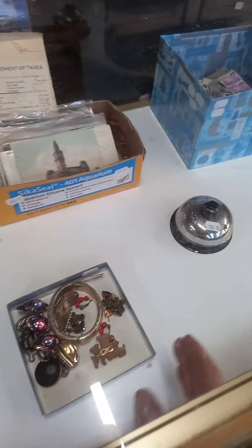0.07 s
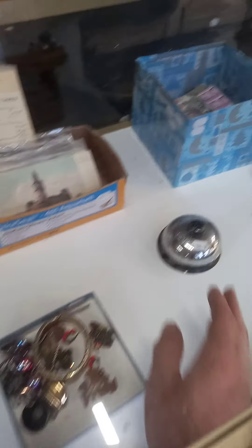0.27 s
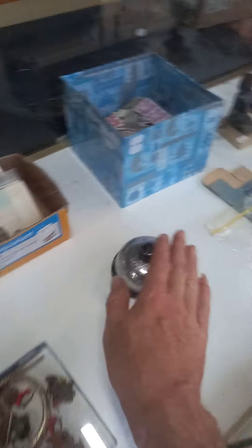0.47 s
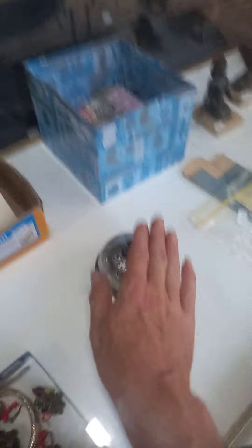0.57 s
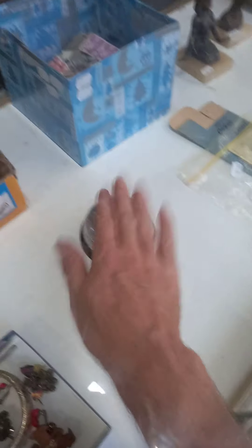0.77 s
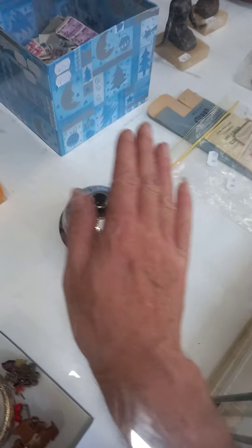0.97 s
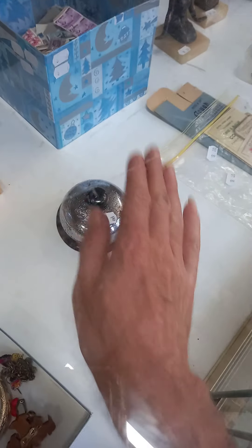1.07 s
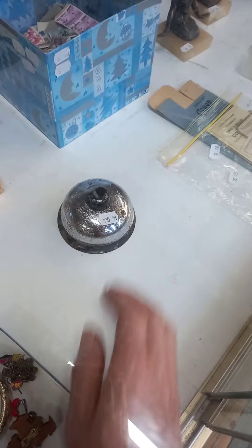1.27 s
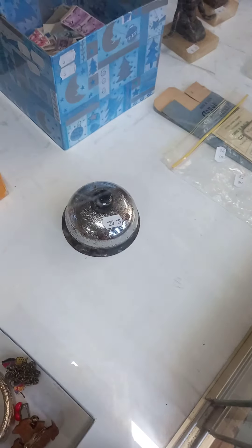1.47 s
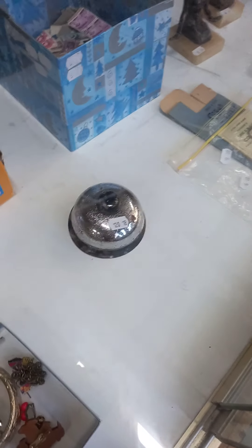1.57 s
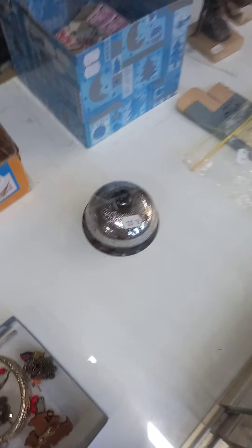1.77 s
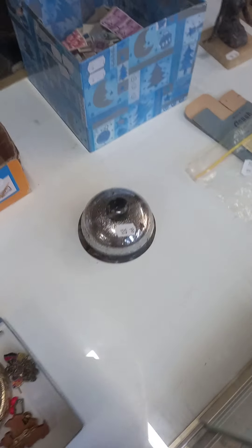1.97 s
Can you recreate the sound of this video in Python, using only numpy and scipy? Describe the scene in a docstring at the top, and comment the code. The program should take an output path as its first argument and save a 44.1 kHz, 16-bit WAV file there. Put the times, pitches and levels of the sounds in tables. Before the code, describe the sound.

A metal counter bell gives one bright ding, starting with a sharp click and small thump and fading unevenly. Before it, the moving hand-held microphone picks up low handling rumble and light rustling in a quiet shop.

```python
"""First comes the low rumble of a hand-held microphone pair in a quiet shop, with scuffs brushing by.
Then a hand slaps the button of a steel counter bell: a crack, a thump in the base, and the dome
rings in pairs of close modes and fades. As the microphones move, a reflection of the bell takes an
ever shorter detour, so the ring swells and sinks. The right microphone faces the bell."""
import sys
import numpy as np
from scipy import signal
from scipy.io import wavfile
from scipy.ndimage import uniform_filter1d

SR = 44100
rng = np.random.default_rng(int(sys.argv[2]) if len(sys.argv) > 2 else 0)


def master_out(mix):
    """Clip the mix to full scale and print it as 16-bit PCM to the path in sys.argv[1]."""
    frames = np.transpose(np.atleast_2d(mix))
    ceiling = np.clip(frames, -1, 1)
    pcm = np.round(ceiling * 32767).astype(np.int16)
    wavfile.write(sys.argv[1], SR, pcm)


N = 89346

BUTTON_S, STRIKE_S = .826, .834
# dome modes: (pitch [Hz], right level [dB], left level [dB], t60 [s], attack [s], right polarity,
# left polarity, right reflection [dB], left reflection [dB], extra detour [mm])
DOME_MODES = [(1097.3, -41.5, -57.0, 2.4, .04, -1, 1, -3.7, -8.0, 212.0),
              (1119.6, -30.5, -43.0, 3.0, .045, 1, -1, -20.0, -15.0, 304.0),
              (2832.6, -19.2, -33.0, 2.9, .008, 1, 1, -4.2, -4.0, 50.0),
              (7642.0, -39, -59.3, .82, .003, 1, 1, -12.0, -9.0, 42.5),
              (7706.0, -21.5, -43.0, .7, .003, 1, 1, -10.0, -9.0, 9.9),
              (10702.0, -23.0, -44.0, .36, .002, 1, 1, -8.0, -6.0, 21.4),
              (14205.0, -19, -29, .2, .002, 1, 1, -2.0, -4.0, 20.2)]
# the bell's reflection: (time [s], detour [m], level [dB])
REFLECTION = [(0.87, 1.402, -22.2), (0.95, 1.339, -16.3), (1.05, 1.264, -8.9), (1.17, 1.177, 0.0),
              (1.3, 1.116, -0.3), (1.42, 1.061, -0.6), (1.55, 0.983, -0.9), (1.67, 0.928, -1.2),
              (1.85, 0.848, -1.6), (2.03, 0.728, -2.0)]
SOUND_M_PER_S, LEFT_DETOUR_M, LEFT_LAG_S = 343, .022, .00003
# the ring's treble swells and sinks on each side as hand and microphones move:
# (time [s], right gain at 8 kHz [dB], left gain at 8 kHz [dB])
RING_TREBLE_LEVEL = [(.84, 4, -0.5), (.9, 3.5, 5), (.94, -3, 7.5), (1.0, 3.5, 9.5), (1.1, 0.5, 6),
                     (1.18, -0.5, 2.5), (1.3, 1, 2.5), (1.55, 1, -11), (1.8, 4.5, -4), (2.03, -1, -1)]
TREBLE_SLOPE = .94
WAVER_DB, WAVER_PER_S, WAVER_GROWS_S = 3.5, 6.0, .27   # the ring wavers as the microphones move
# uneven fade of the beating pair, right side: (time [s], lower mode level [dB], upper mode level [dB])
PAIR_FADE = [(.87, -19, -27), (.93, -29, -23.5), (.97, -26.5, -27.5), (1.07, -29, -37.5),
             (1.14, -44, -38.5), (1.19, -46.5, -35), (1.28, -36.5, -40), (1.33, -49.5, -45),
             (1.4, -36.5, -40.5), (1.43, -39, -61.5), (1.465, -58, -46), (1.5, -42, -64),
             (1.55, -49, -62.5), (1.64, -59.5, -55.5), (1.72, -55.5, -65.5), (1.78, -53, -61.5),
             (1.86, -72.5, -64.5), (2.02, -64, -77.5)]
PAIR_HZ, PAIR_LEFT_DB, PAIR_WANDER_RAD = (5010.5, 5066.0), -9.5, .59
# faint dome overtones: (pitch [Hz], level [dB], t60 [s])
OVERTONES = [(2195, -57, 1.2), (3330, -65, 1.3), (3932, -61, 1.1), (5540, -66, 1.6), (8990, -54, .14),
             (9480, -53, .14), (10020, -56, .35), (11500, -38, .1), (12720, -50, .38), (14130, -43, .25),
             (15390, -40, .22)]
SHIMMER_HZ, SHIMMER_MIN_DB, SHIMMER_MEAN_T60_S = (10400, 15600), -55, .2
OVERTONE_PAN_DB, FLICKER_DB, FLICKER_PER_S = -8.5, 5, 18

# tone of the crack: (frequency [Hz], relative density [dB])
CRACK_TONE = [(50, -12.5), (100, 2), (300, -10.5), (700, -18), (1500, -20.5), (3000, -20.5), (4300, -22),
              (6500, -18.5), (8000, -15.5), (9000, -42.5), (10200, -38.5), (11300, -2), (13000, -11),
              (14500, -15), (16000, -24.5)]
# decay of its tail: (frequency [Hz], t60 [s])
TAIL_DECAY = [(100, 0.52), (300, 0.66), (1500, 0.3), (4000, .24), (6500, 0.27), (9000, 0.069),
              (12000, 0.13), (15500, 0.094)]
# its placement: (frequency [Hz], left minus right [dB])
CRACK_PAN = [(60, -9), (110, -5), (200, 4), (380, -3.5), (700, -8), (1290, -14.5), (4400, -10.5),
             (8120, -8.5), (15000, -26.5)]
BUTTON_DB, SNAP_DB, TAIL_DB, ATTACK_CYCLES = -23.5, -23.5, -32, 1.6
# modes of base and counter: (pitch [Hz], level [dB], t60 [s])
BASE_MODES = [(95, -51, 0.27), (255, -32.5, .15), (1890, -39, 0.028)]
# their placement: (frequency [Hz], left minus right [dB])
BASE_PAN = [(100, -6.5), (270, 5), (800, -10), (2000, -16.5)]
CHATTER_FROM_S, CHATTER_TO_S, CHATTER_PER_S, CHATTER_DB = .022, .062, 450, -7.5   # as the hand presses

# scuff cues: (time [s], level [dB], t60 [s], left minus right [dB])
SCUFF_CUES = [(.081, -49, 0.1, -12.5), (0.094, -46.5, 0.35, -5), (0.336, -49.5, 0.089, -8),
              (0.352, -56, 0.26, -11), (0.952, -50, 0.12, -10), (1.525, -66, 0.22, -11.5)]
# scuff tone: (frequency [Hz], relative density [dB])
SCUFF_TONE = [(410, -42), (700, -6.5), (1700, -8), (2640, -8), (3480, -33.5), (3900, -14.5), (4950, -34.5),
              (14000, -52.5)]
# tick cues: (time [s], level [dB], pitch [Hz], t60 [s], left minus right [dB])
TICK_CUES = [(.505, -60.5, 5170, .02, -10), (.956, -56, 3900, .02, -9), (1.990, -44.5, 9600, 0.0013, -16)]
# opening grip rumble: (time [s], level [dB])
RUMBLE_FADER = [(0, -37), (.05, -40), (.1, -32), (.24, -32), (.3, -37), (.35, -38), (.44, -58), (.52, -66),
                (.6, -78)]
# its tone: (frequency [Hz], relative density [dB])
RUMBLE_TONE = [(30, -35), (55, -23), (82, -1), (105, 2.5), (133, -16.5), (168, -1), (195, -23), (265, -1),
               (320, -24.5), (364, -2.5), (440, -19), (550, -18.5), (900, -33), (1600, -41), (2700, -46),
               (3200, -68)]
# later, softer bumps: (time [s], level [dB])
BUMP_FADER = [(1.1, -72), (1.25, -57.5), (1.29, -68.5), (1.37, -58), (1.464, -62.5), (1.522, -49.5),
              (1.614, -62.5), (1.65, -71), (1.788, -79.5), (1.81, -64), (1.846, -53.5), (1.896, -53),
              (1.998, -83), (2.026, -60.5)]
# their tone: (frequency [Hz], relative density [dB])
BUMP_TONE = [(30, -15), (81, -1.5), (125, -7.5), (208, 1), (353, -17.5), (453, -13), (556, -40),
             (1000, -21), (1300, -58), (2200, -120)]
# placement of rumble and bumps: (frequency [Hz], left minus right [dB])
HANDLING_PAN = [(60, 0.5), (400, -2.5), (700, 5), (1300, -9), (2400, -16)]

# the shop's room tone: (frequency [Hz], relative density [dB])
ROOM_TONE = [(30, -30.5), (60, -9), (106, -3.5), (250, -9), (500, -20), (1000, -18), (1500, -22.5),
             (2600, -26), (3000, -43.5), (3700, -34), (4900, -32.5), (6000, -25.5), (7300, -33),
             (8300, -48), (10000, -41.5), (12000, -38.5), (16000, -46)]
# its placement: (frequency [Hz], left minus right [dB])
ROOM_PAN = [(60, 4), (110, 0.5), (200, 1.5), (380, -1.5), (700, -3.5), (1290, 0), (2380, -14), (4400, 5),
            (8120, -2), (15000, -3.5)]
# ride on its hiss, with a brief rustle near 1.54 s, taken about the mean: (time [s], level [dB])
HISS_FADER = [(0.0, -80.5), (0.28, -76.5), (0.66, -82.5), (0.88, -87.5), (0.97, -75.5), (1.36, -88),
              (1.43, -82.5), (1.52, -82), (1.538, -76.5), (1.56, -89), (2.03, -92)]
# stereo width of all noise layers: (frequency [Hz], left-right correlation [0..1])
CORRELATION = [(60, 0.95), (240, 0.86), (950, 0.49), (3770, 0.14), (15000, 0.52)]
ROOM_DB, LOW_CUT_HZ, HIGH_CUT_HZ = -65.5, 40, 16500
NOW = np.arange(N) / SR


def dome():
    """Each mode arrives direct and reflected, phasing with itself; the highs swell and sink most."""
    out = np.zeros((2, N))
    detour_m, reflection_db = in_time(REFLECTION)
    treble_db = in_time(RING_TREBLE_LEVEL)[::-1]
    for (hz, right_db, left_db, t60, attack_s, right_sign, left_sign,
         right_echo_db, left_echo_db, extra_mm) in DOME_MODES:
        sides = [(left_db, left_sign, left_echo_db), (right_db, right_sign, right_echo_db)]
        for side, (db, sign, echo_db) in enumerate(sides):
            age = NOW - STRIKE_S - LEFT_LAG_S * (1 - side)
            waver_db = WAVER_DB * drift(WAVER_PER_S) * np.clip(age / WAVER_GROWS_S, 0, 1)
            motion_db = (treble_db[side] + waver_db) * (hz / 8000) ** TREBLE_SLOPE
            echo_m = detour_m + extra_mm / 1000 + LEFT_DETOUR_M * (1 - side)
            for delay_s, path_db in ((0, 0), (echo_m / SOUND_M_PER_S, reflection_db + echo_db)):
                rung_s = np.maximum(age - delay_s, 0)
                attack = 1 - np.exp(-rung_s / attack_s)
                level = from_db(db + path_db + motion_db - 60 * rung_s / t60)
                out[side] += sign * attack * level * np.sin(2 * np.pi * hz * rung_s)
    return out


def beating_pair():
    """Two close modes beat; wandering phases make the flutter uneven, with shallower dips on the left."""
    out, age = np.zeros((2, N)), np.maximum(NOW - STRIKE_S, 0)
    attack = 1 - np.exp(-age / .0055)
    for hz, right_db in zip(PAIR_HZ, in_time(PAIR_FADE)):
        left_db = PAIR_LEFT_DB + uniform_filter1d(right_db, size=SR // 8) + WAVER_DB * drift(WAVER_PER_S)
        for side, db in enumerate((left_db, right_db)):
            wander = PAIR_WANDER_RAD * drift(WAVER_PER_S) * np.clip(age / WAVER_GROWS_S, 0, 1)
            out[side] += attack * from_db(db) * np.sin(2 * np.pi * hz * age + wander)
    return out


def overtones():
    """Flickering overtones and a shimmer of weak modes at random pitches, each side in its own phase."""
    pitch, loudness, length = rng.random((40, 3)).T
    shimmer = zip(np.interp(pitch, [0, 1], SHIMMER_HZ), SHIMMER_MIN_DB + 10 * loudness,
                  SHIMMER_MEAN_T60_S * (.5 + length))
    out, age = 0, np.maximum(NOW - STRIKE_S, 0)
    for hz, db, t60 in [*OVERTONES, *shimmer]:
        level = from_db(db + FLICKER_DB * drift(FLICKER_PER_S)) * decay(STRIKE_S, t60, attack_s=.00504)
        cycles = hz * age + rng.random((2, 1))
        out += level * np.sin(2 * np.pi * cycles + drift(FLICKER_PER_S))
    return pan(OVERTONE_PAN_DB) * out


def crack():
    """The transient: button touch, clapper snap, and a noisy tail dying band by band."""
    def envelope(hz):
        soften_s = ATTACK_CYCLES / hz   # low bands speak more slowly
        touch = from_db(BUTTON_DB) * decay(BUTTON_S, t60=.084, attack_s=.00095 + soften_s)
        snap = from_db(SNAP_DB) * decay(STRIKE_S, t60=.011, attack_s=.0003)
        tail = from_db(TAIL_DB) * decay(STRIKE_S, at_hz(TAIL_DECAY, hz), attack_s=.001025 + soften_s)
        return pan(at_hz(CRACK_PAN, hz)) * (touch + snap + tail)
    return noise_bands(CRACK_TONE, envelope)


def base_thump():
    """The body of the hit: the slap and the chattering button set base and counter ringing."""
    out, age = 0, NOW - BUTTON_S
    pressing = (age > CHATTER_FROM_S) * (age < CHATTER_TO_S)
    for hz, db, t60 in BASE_MODES:
        contacts = pressing * (rng.random(N) < CHATTER_PER_S / SR)
        clicks = contacts * rng.standard_normal(N) * from_db(CHATTER_DB)
        clicks[int(BUTTON_S * SR)] = 1   # the slap itself
        out += from_db(db) * pan(at_hz(BASE_PAN, hz)) * ring(clicks, hz, t60)
    return out


def scuffs():
    """Short brushes of grainy noise."""
    envelope = sum(from_db(db) * pan(pan_db) * decay(s, t60, attack_s=.00075)
                   for s, db, t60, pan_db in SCUFF_CUES)
    return noise_bands(SCUFF_TONE, lambda hz: envelope * from_db(3 * drift(60)))


def ticks():
    """Thin ticks, each a click with one brief high ring."""
    return sum(pan(pan_db) * ring(from_db(db) * (np.arange(N) == int(s * SR)), hz, t60)
               for s, db, hz, t60, pan_db in TICK_CUES)


def handling():
    """Lumpy low rumble from the grip, strong at first, later a few soft bumps."""
    out, lumps_db = 0, .45 * drift(7.2)
    for fader, tone in ((RUMBLE_FADER, RUMBLE_TONE), (BUMP_FADER, BUMP_TONE)):
        gate = (NOW >= fader[0][0]) * (NOW <= fader[-1][0])
        rumble = noise_bands(
            tone, lambda hz: pan(at_hz(HANDLING_PAN, hz)) * from_db(lumps_db + 3 * drift(17)))
        out += gate * from_db(in_time(fader)[0]) * rumble
    return out


def shop():
    """A faint bed of room tone; its hiss sinks and swells, and a brief bright rustle rides on it near 1.54 s."""
    hiss_db = in_time(HISS_FADER)[0]
    hiss_db -= hiss_db.mean()
    return from_db(ROOM_DB) * noise_bands(
        ROOM_TONE, lambda hz: pan(at_hz(ROOM_PAN, hz)) * from_db(.76 * drift(3) + (hz > 2800) * hiss_db))


def from_db(db):
    """Decibels to gain."""
    return 10 ** (np.asarray(db) / 20)


def at_hz(rows, hz):
    """Read a table on a log-frequency axis."""
    frequencies, values = np.transpose(rows)
    return np.interp(np.log(hz), np.log(frequencies), values)


def in_time(rows):
    """A table's automation curves at every sample."""
    times, *columns = np.transpose(rows)
    return [np.interp(NOW, times, column) for column in columns]


def pan(db):
    """Left and right gains for a left-minus-right level."""
    return from_db([[db / 2], [-db / 2]])


def decay(start_s, t60, attack_s):
    """Percussive envelope: a quick rise, then 60 dB down per t60."""
    age = np.maximum(NOW - start_s, 0)
    return (1 - np.exp(-age / attack_s)) * from_db(-60 * age / t60)


def drift(rate):
    """Smooth random modulation of spread 1, rolling off above rate [Hz]."""
    hop, settle = 40, 2000
    pole = np.exp(-2 * np.pi * rate * hop / SR)
    white = rng.standard_normal(N // hop + settle + 2)
    slow = signal.lfilter([1], [1, -2 * pole, pole * pole], white)[settle:]
    return np.interp(np.arange(N) / hop, np.arange(len(slow)), slow / slow.std())


def ring(clicks, hz, t60):
    """Resonator: a unit click starts a dying sine of height 1."""
    pole, step = from_db(-60 / (t60 * SR)), 2 * np.pi * hz / SR
    return signal.lfilter([0, np.sin(step)], [1, -2 * pole * np.cos(step), pole * pole], clicks + 1e-18)


def noise_bands(tone, envelope):
    """Quarter-octave bands of stereo noise, total rms 1, then each shaped by envelope(hz)."""
    low, high = tone[0][0], min(tone[-1][0], .45 * SR)
    edges = np.geomspace(low, high, int(4 * np.log2(high / low)) + 1)
    centres = np.sqrt(edges[1:] * edges[:-1])
    gains = from_db(at_hz(tone, centres))
    gains /= np.sqrt(np.sum(gains ** 2 * np.diff(edges)) * 2 / SR)
    white, out = rng.standard_normal((2, 2, N + SR // 4)), 0
    for k, hz in enumerate(centres):
        bandpass = signal.butter(3, edges[k:k + 2], "band", fs=SR, output="sos")
        mid, side = signal.sosfilt(bandpass, white[k % 2])[:, -N:]
        alike = at_hz(CORRELATION, hz)
        stereo = np.sqrt((1 + alike) / 2) * mid + np.sqrt((1 - alike) / 2) * side * [[1], [-1]]
        out += gains[k] * envelope(hz) * stereo
    return out


def scene():
    """The stereo mix: the bell in front, small noises and room tone behind."""
    bell = dome() + beating_pair() + overtones() + crack() + base_thump()
    return bell + scuffs() + ticks() + handling() + shop()


def record(dry):
    """The microphones lose the deep bass; the very top is cut steeply."""
    dry = signal.sosfilt(signal.butter(3, LOW_CUT_HZ, "high", fs=SR, output="sos"), dry)
    return signal.sosfilt(signal.cheby2(12, 70, HIGH_CUT_HZ, fs=SR, output="sos"), dry)


dry = scene()
out = record(dry)
master_out(out)
```